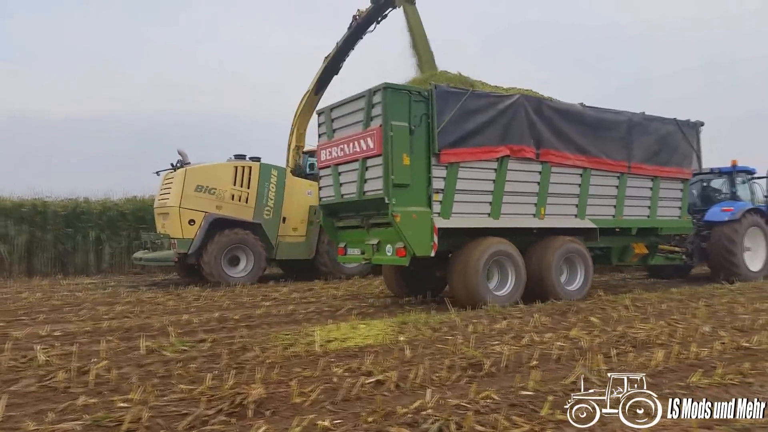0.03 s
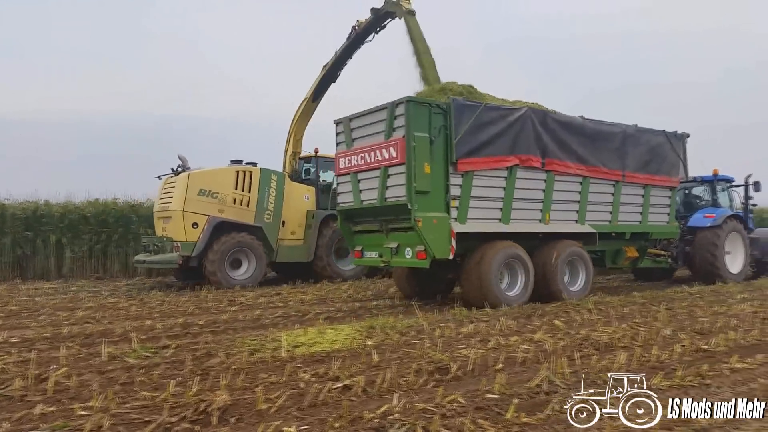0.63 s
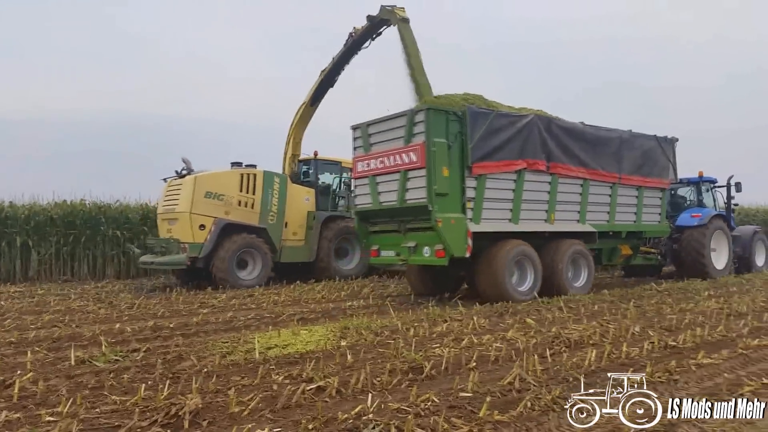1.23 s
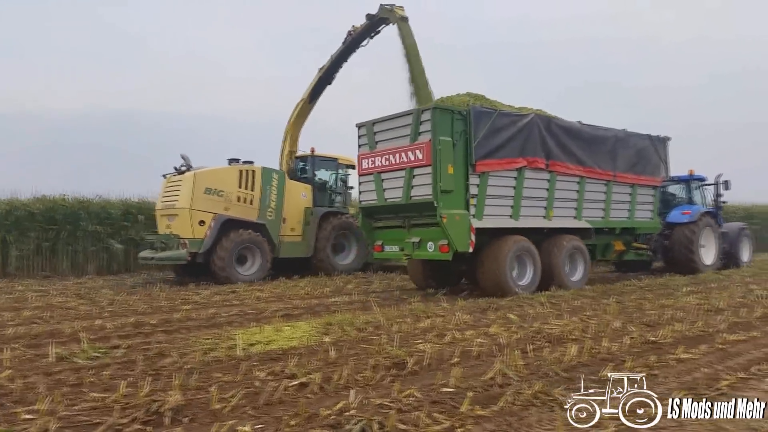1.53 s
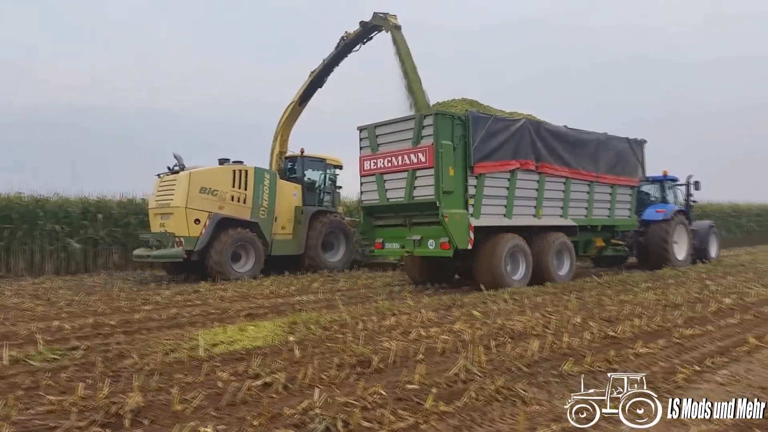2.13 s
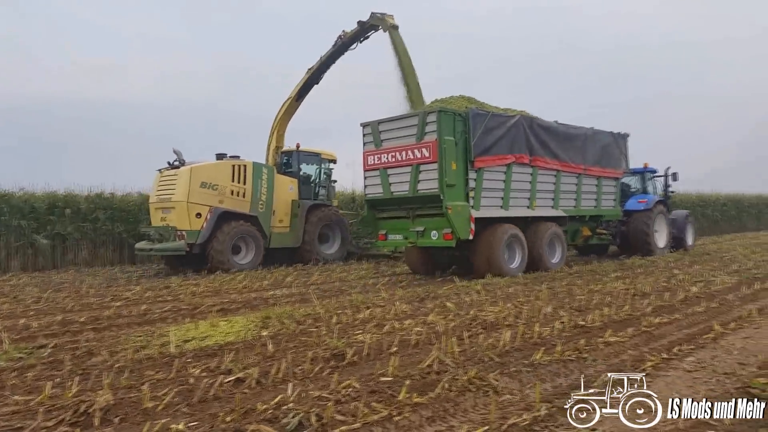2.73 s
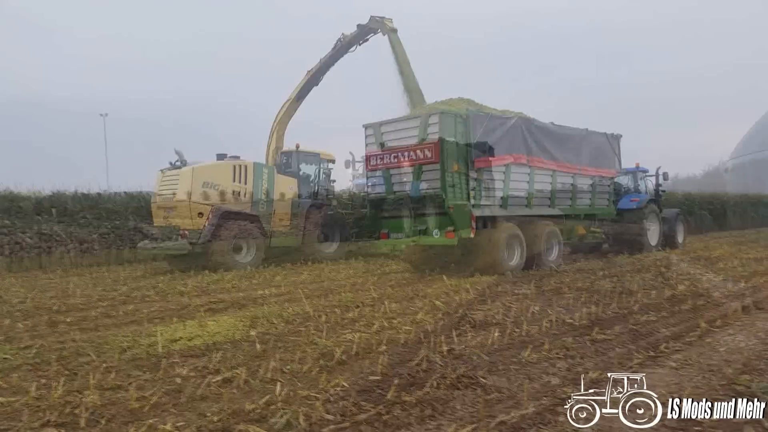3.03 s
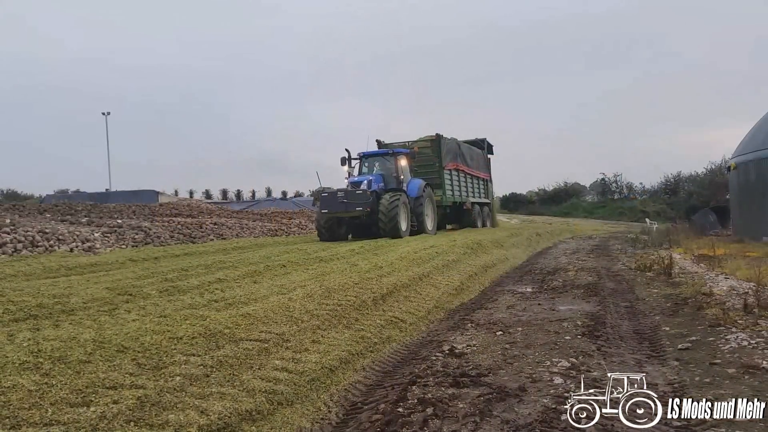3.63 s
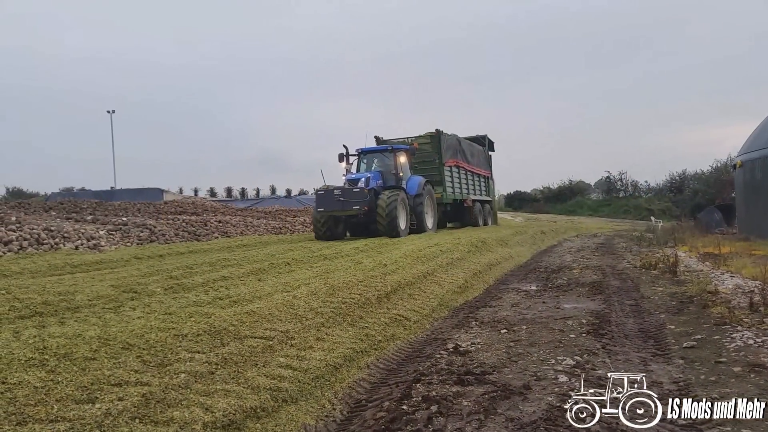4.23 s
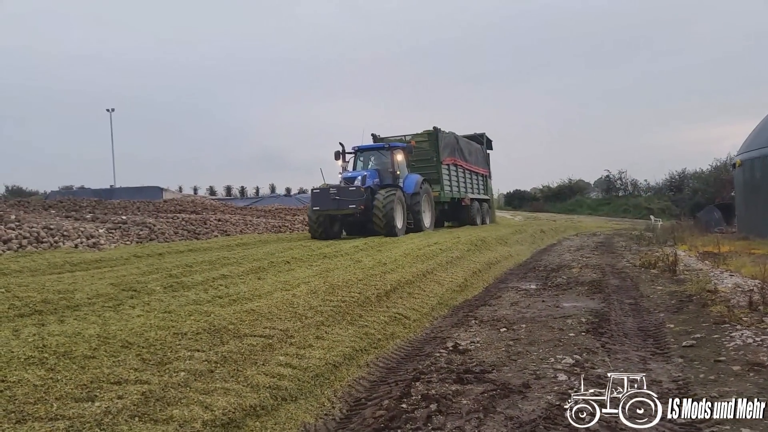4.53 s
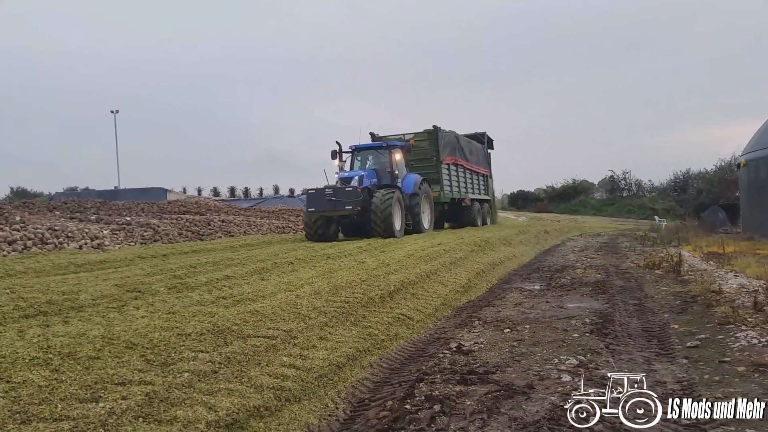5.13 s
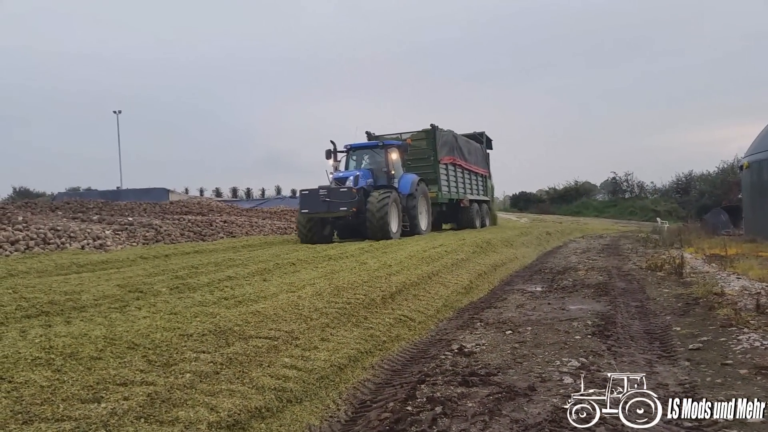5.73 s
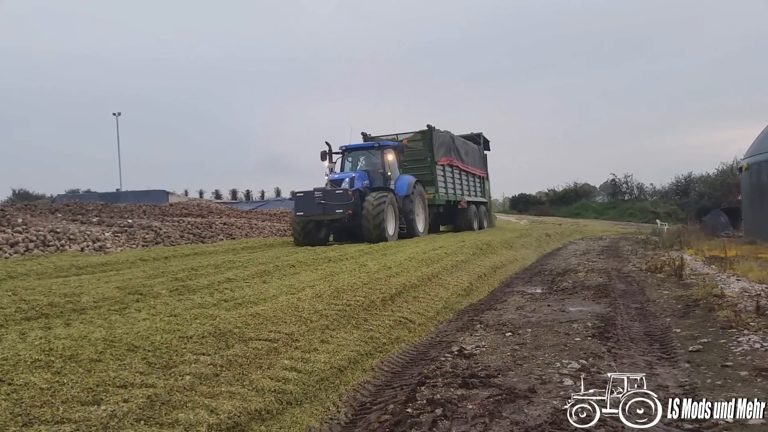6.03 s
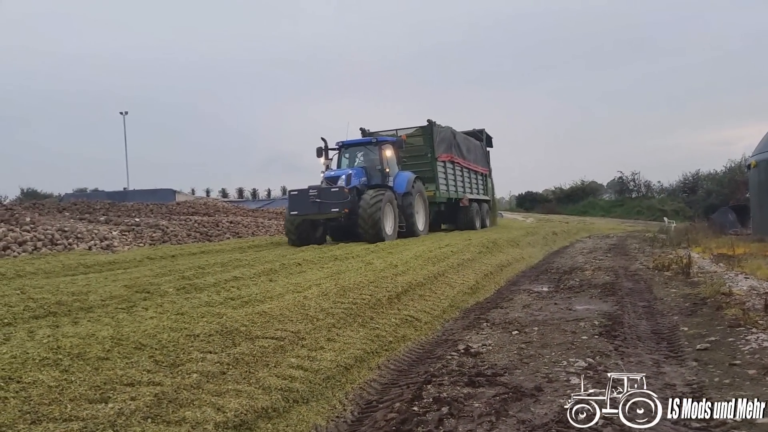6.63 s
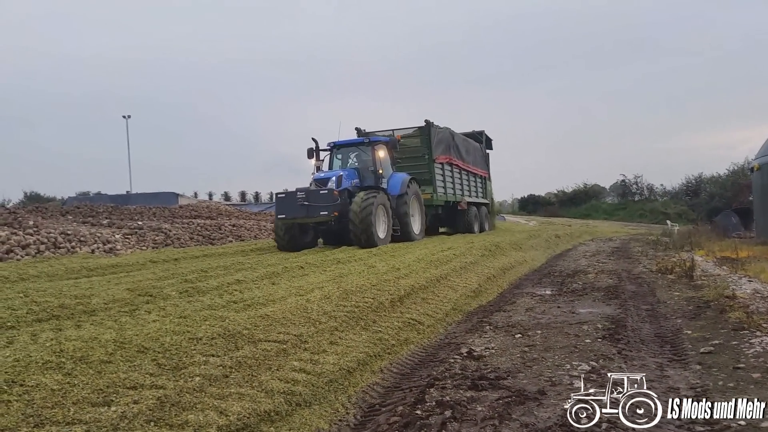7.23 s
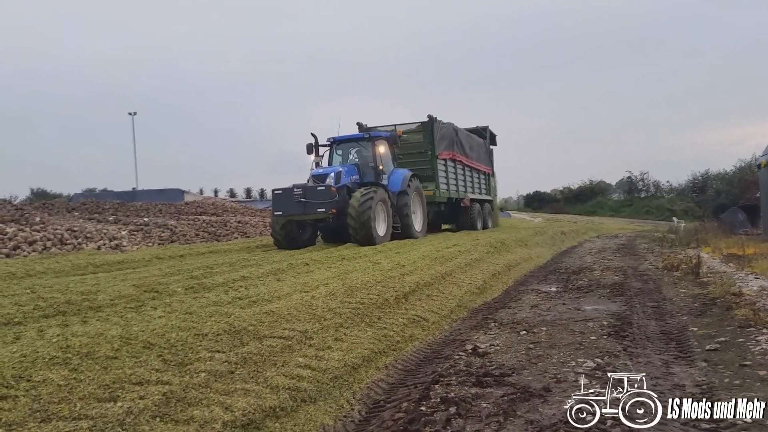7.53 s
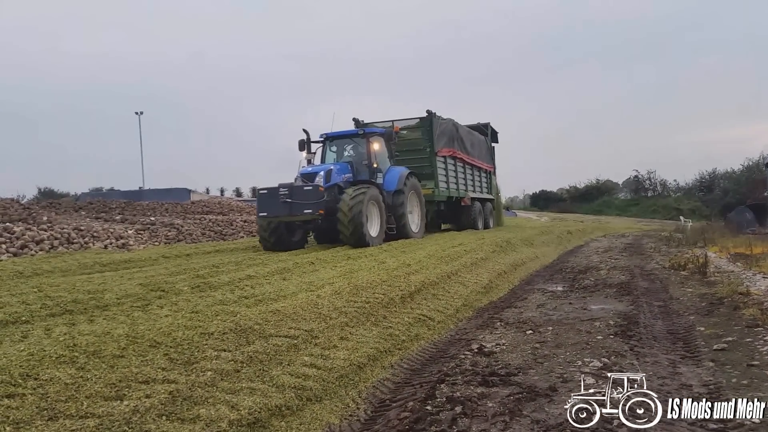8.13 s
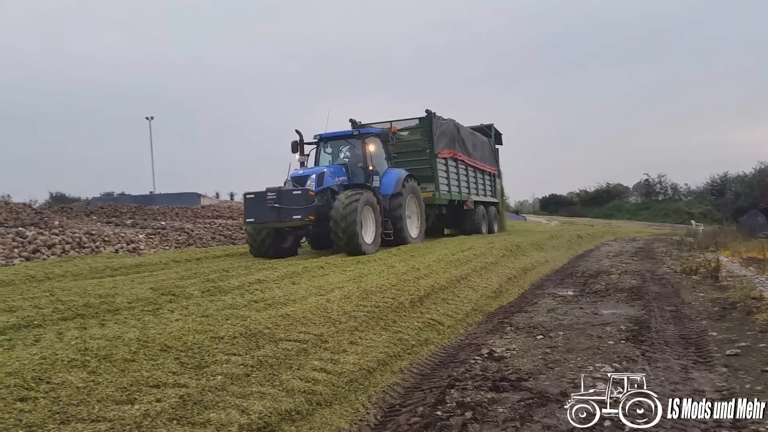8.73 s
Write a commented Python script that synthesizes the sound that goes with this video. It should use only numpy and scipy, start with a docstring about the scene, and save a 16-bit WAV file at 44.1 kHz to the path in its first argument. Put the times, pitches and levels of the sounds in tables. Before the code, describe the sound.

First comes the loud, steady roar and deep hum of a forage harvester, with a high whistle and crop hissing unevenly from its spout. Before halfway, this blends into the softer drone of a diesel tractor outdoors on a farm. The engine throbs and clatters as it slowly nears the microphone, joined by brief faint whines, short rustles of sliding crop and, late on, tiny high metal squeaks.

```python
"""On a farm at maize harvest, a forage harvester chops at full load: its diesel and cutter drum drone in the
blower's roar, two turbochargers whistle, and crop hisses from the spout in wads.
It fades over into a tractor creeping closer over a silage clamp with its trailer. Six cylinders thrum
and clatter, the turbo whistle follows the load, chopped crop slides and rustles, and steel chirps."""
import sys
import numpy as np
from scipy import signal
from scipy.fft import rfft, irfft, next_fast_len
from scipy.io import wavfile
from scipy.ndimage import map_coordinates

SR = 44100
rng = np.random.default_rng(int(sys.argv[2]) if len(sys.argv) > 2 else 0)


def pcm_store(signal):
    """Save signal as 16-bit PCM."""
    levels = np.round(np.clip(np.atleast_2d(signal), -1, 1) * 32767)
    wavfile.write(sys.argv[1], SR, levels.astype(np.int16).T)


N = 396018


def amp(db):
    """Amplitude ratio of a level in decibels."""
    return 10 ** (np.asarray(db) / 20)


def unit(x):
    """Normalisation to rms 1."""
    return x / np.sqrt(np.mean(x ** 2) + 1e-20)


def curves(rows):
    """Linear interpolation: one value per sample for each column after the time."""
    times, *columns = np.transpose(rows)
    return [np.interp(np.arange(N) / SR, times, column) for column in columns]


def wobble(rate):
    """Smooth random modulation, with rate knots a second."""
    knots = rng.standard_normal(int(N * rate / SR) + 4)
    return map_coordinates(knots, [np.arange(N) * rate / SR], mode="nearest")


def swells(rows):
    """Incoherent sum: powers of bell-shaped swells (time [s], half-power length [s], level [dB]) add."""
    t = np.arange(N) / SR
    return sum(amp(db) ** 2 * .5 ** ((2 * (t - s) / length) ** 2) for s, length, db in rows)


def filtered(x, response):
    """Linear filtering: the spectrum of x times a frequency response."""
    size = next_fast_len(N + 8192)
    return irfft(rfft(x, size) * response(np.fft.rfftfreq(size, 1 / SR)), size)[..., :N]


def below(hz, edge_hz):
    """Gain of a tenth-order low-pass."""
    return 1 / np.sqrt(1 + (hz / edge_hz) ** 20)


def split(x, edge_hz):
    """Crossover: the bands under and over an edge, each at rms 1."""
    low = filtered(x, lambda hz: below(hz, edge_hz))
    high = filtered(x, lambda hz: np.sqrt(1 - below(hz, edge_hz) ** 2))
    return np.array([unit(low), unit(high)])


def resonant(x, body):
    """A body's resonances and antiresonances colour x; the result has rms 1."""
    gain_db = lambda hz: sum(db * np.exp(-((hz - centre) / width) ** 2) for centre, width, db in body)
    return unit(filtered(x, lambda hz: amp(gain_db(hz))))


def pan(lean_db):
    """Constant-power panning: the left gain exceeds the right by lean_db."""
    gains = amp(np.array([np.atleast_1d(lean_db), -np.atleast_1d(lean_db)]) / 2)
    return gains / np.sqrt(np.mean(gains ** 2, axis=0))


def aslant(x, lead_ms, bass_rad):
    """Interchannel phase difference: the left leads in time, and by a further angle in the bass."""
    bass = lambda hz: bass_rad * hz / (hz + 20) / (1 + (hz / 900) ** 2)
    phase = lambda hz: 2 * np.pi * hz * lead_ms / 1000 + bass(hz)
    return filtered(x, lambda hz: np.exp(np.array([[1j], [-1j]]) * phase(hz) / 2))


def rush(colour, drive=1, lead_ms=0):
    """Partly coherent stereo noise of rms 1, modulated by drive, then coloured; the left leads."""
    knots_hz, level, lean, coherence = np.transpose(colour)
    size = next_fast_len(N + 8192)
    hz = np.fft.rfftfreq(size, 1 / SR) + 1
    along = lambda column: np.interp(np.log(hz), np.log(knots_hz), column)
    band = below(hz, knots_hz[-1] * 1.1) * below(knots_hz[0] / 1.1, hz)
    angle = np.arccos(np.clip(along(coherence), 0, 1)) / 2
    mid, side = rfft(drive * rng.standard_normal((2, N)), size)
    pair = np.cos(angle) * mid + np.array([[1], [-1]]) * np.sin(angle) * side
    delay = np.exp(np.array([[1j], [-1j]]) * np.pi * hz * lead_ms / 1000)
    return unit(irfft(pair * delay * pan(along(lean)) * amp(along(level)) * band, size)[:, :N])


def narrow(centre_hz, width_hz):
    """Random excitation of one resonance, in stereo at rms 1."""
    response = lambda hz: 1 / (1 + ((hz - centre_hz) / width_hz) ** 2) ** 2
    return unit(filtered(rng.standard_normal((2, N)), response))


def tone(turns, waver_db, rate):
    """A sinusoid of rms 1 under random amplitude modulation."""
    return unit(amp(waver_db * wobble(rate)) * np.sin(2 * np.pi * (turns + rng.random())))


def whistle(hz, jitter_hz, waver_db):
    """Random frequency modulation broadens a tone into a slightly fuzzy line."""
    return tone(np.cumsum(hz + jitter_hz * wobble(200)) / SR, waver_db, rate=25)


def grains(rate, life_s, spread_db):
    """Shot noise: an rms-1 envelope of many tiny impacts, a few of them large."""
    hits = (rng.random(N) < rate / SR) * amp(spread_db * np.minimum(rng.exponential(size=N), 4))
    return unit(np.sqrt(signal.lfilter([1], [1, -np.exp(-1 / (life_s * SR))], hits ** 2)))


def cycles(speed, flutter):
    """Phase is the integral of speed: one four-stroke cycle for two turns of the crank."""
    rpm, = curves(speed)
    return np.cumsum(rpm * (1 + flutter * wobble(14))) / (120 * SR)


def firings(cycle, decay, scatter_db, count):
    """An envelope of count exponential decays a cycle, each of random strength."""
    stroke, since = np.divmod(cycle * count, 1)
    strength = amp(scatter_db * rng.standard_normal(4096))[stroke.astype(int) % 4096]
    return unit(strength * np.exp(-since / decay))


def nearness():
    """Spherical spreading: the approaching tractor's gain goes as one over distance, and is 1 at 6.5 s."""
    distance_m, creep_m_per_s = 20, 0.98
    return distance_m / np.maximum(distance_m - creep_m_per_s * (np.arange(N) / SR - 6.5), 1)


def trailer_chirps():
    """Friction of steel on steel briefly excites two close, high modes."""
    # rubs on the trailer: (time [s], level [dB])
    rubs = [(7.499, -40), (7.64, -41), (7.70, -37), (7.735, -35), (7.81, -36), (8.015, -38), (8.066, -34),
            (8.24, -38), (8.485, -37), (8.593, -33), (8.642, -39), (8.77, -32), (8.877, -39), (8.927, -39)]
    t = np.arange(N) / SR
    envelope = sum(amp(db) * np.exp(-((t - s - .004) / 0.013) ** 2) for s, db in rubs)
    return envelope * rush([(7700, -10, -5, .5), (8446, 2, -10, 0.53), (8856, -14, -4, .6),
                            (9240, -3, -3, .6), (9600, -20, -3, .5)])


def silage():
    """Granular impacts: crop slides in spurts; hard ones ring the trailer wall and scrape lower down."""
    # sliding crop: (time [s], length [s], fizz over the trickle [dB], rustle over the trickle [dB])
    spurts = [(4.55, .07, 4, -5), (4.83, .07, 0, -6), (5.02, 0.065, 3.5, -6), (5.23, .1, 6, 0),
              (5.56, .04, 3, -6), (5.93, .06, 0, -9), (6.08, 0.12, 11, 6.5), (6.23, .2, 7, 1),
              (6.58, 0.061, 2, -7), (6.9, .06, 6, -7), (7.48, .14, 8, 2), (7.72, .16, 14, 5),
              (7.96, 0.26, 5, 2.5), (8.35, .25, 6, 2), (8.62, 0.11, 13, 0), (8.87, .35, 14, -1.5)]
    # rustle spectrum: (frequency [Hz], density [dB], left minus right [dB], coherence [0-1])
    colour = [(8100, -4, -13, 0.13), (9000, -4, 2, 0.056), (9950, 2.5, 1, 0.033), (12100, -1.5, 1.5, 0.034),
              (13450, -6, -2, 0.16), (14200, -2, -9, 0.34), (15600, -3, -8, .3)]
    # trailer wall's peaks and hollows: (frequency [Hz], width [Hz], gain [dB])
    wall = [(8560, 260, 8), (9220, 180, 8), (12900, 400, -2), (13600, 170, 3), (14303, 430, 7),
            (15450, 250, 4)]
    fine = 1 + swells((s, length, db) for s, length, db, _ in spurts)
    coarse = 1 + swells((s, length, db) for s, length, _, db in spurts)
    force = np.clip(10 * np.log10(fine) / 11 + .1, 0, 1)
    trickle = 0.5 + .5 * grains(rate=920, life_s=0.0015, spread_db=4)
    soft = split(rush(colour, trickle), edge_hz=12200)
    patter = 5 + 1.3 * grains(rate=330, life_s=0.0015, spread_db=7)
    hard = split(resonant(rush(colour, patter), wall), edge_hz=12600)
    rustle, fizz = np.sqrt(1 - force) * soft + np.sqrt(force) * hard
    scrape = amp(-2.5) * force * rush([(4000, -3, -9, .2), (5520, 1.5, -16, .2), (8000, -4, -15, .2)])
    crop = amp(-40.5) * np.sqrt(coarse) * (rustle + scrape) + amp(-47.5) * np.sqrt(fine) * fizz
    return nearness() ** 2.5 * crop


def transmission_whine():
    """The tractor's transmission radiates a narrow spectral line in short spells."""
    # spells of whine: (time [s], length [s], frequency [Hz], level [dB])
    spells = [(4.27, 0.33, 1000, -35.5), (5.382, 0.28, 905, -37.5), (6.581, 0.21, 896, -35),
              (7.08, 0.27, 910, -33)]
    return sum(np.sqrt(swells([(s, length, db)])) * whistle(hz, jitter_hz=9.1, waver_db=2)
               for s, length, hz, db in spells)


def tractor_turbo(hz, boost_khz):
    """Directivity: the whistle grows steeply as its beam nears, and also with turbo speed."""
    # flares of the whistle: (time [s], length [s], level over the usual [dB])
    flares = [(6.81, .06, 3), (7.92, 0.091, 8), (8.21, 0.05, 9)]
    beam = nearness() ** 3.8 * np.sqrt(1 + swells(flares))
    return amp(-49 + 3 * boost_khz) * beam * whistle(hz, jitter_hz=65, waver_db=2.2)


def tractor_rumble(cycle, boost_khz):
    """Amplitude modulation: low noise pulses at the firing rate and grows with load."""
    # rumble spectrum: (frequency [Hz], density [dB], left minus right [dB], coherence [0-1])
    colour = [(22, -28, -0.8, 0.97), (45, -13, -1.0, 0.98), (75, -6, 1, 0.96), (149, -7, -4.5, 0.94),
              (203, -7.5, 0, 0.91), (265, -11.5, -5, 0.96), (358, -15.5, -2, 0.94)]
    pulses = 1 + .5 * firings(cycle, decay=.5, scatter_db=3, count=6)
    return amp(-29.5 + 1.1 * boost_khz) * rush(colour, pulses, lead_ms=-0.017)


def tractor_clatter(cycle, boost_khz):
    """Impact excitation: injectors strike the block's modes once a firing, valves twice as often."""
    # clatter spectrum: (frequency [Hz], density [dB], left minus right [dB], coherence [0-1])
    colour = [(387, -13.5, -1, 0.68), (469, -0.7, -4.5, 0.96), (548, -6.5, -4.5, 0.91),
              (844, -4, -3.5, 0.84), (980, -3.5, -3.5, 0.93), (1306, -11.5, -2.5, 0.14),
              (1690, -4.5, -4.5, 0.68), (2045, -15, -4, 0.26), (2380, -10, -4, 0.66),
              (2830, -17.5, -12, 0.35), (3020, -16, -8, 0.47), (3820, -19, -10, 0.47),
              (6600, -22, -20, 0.19), (8200, -27, -5, 0.87)]
    # engine block's peaks and hollows: (frequency [Hz], width [Hz], gain [dB])
    block = [(491, 29, 0.5), (906, 19, 4), (965, 7.6, -1), (1623, 43, 2), (1720, 22, -4), (1820, 50, 1.5),
             (3130, 52, 5)]
    injectors = 0.23 * firings(cycle, decay=1, scatter_db=5, count=6)
    valves = 0.25 * firings(cycle, decay=1, scatter_db=4.5, count=12)
    knocks = rush(colour, 1 + injectors + valves, lead_ms=-0.047)
    return amp(-25.5 + 0.65 * boost_khz) * resonant(knocks, block)


def stack_puffs(cycle):
    """A pulse train: six cylinders each send a blunt puff up the stack, no two equally strong."""
    rise_share, scatter_db = .12, 3.5
    stroke, since = np.divmod(cycle * 6, 1)
    age = since / rise_share
    strength = amp(scatter_db * np.clip(rng.standard_normal(4096), -2, 2))[stroke.astype(int) % 4096]
    return unit(filtered(-strength * age * np.exp(-age), lambda hz: below(46, hz + 1) * below(hz, 370)))


def tractor_thrum(cycle):
    """Superposition: tones follow the crank, and two exhaust orders boom over the stack's puffs."""
    # engine tones, plus a faint wavering tone near 700 Hz that fills out the midrange:
    # (rate [per four-stroke cycle], level [dB])
    partials = [(5, -36), (6, -34), (7, -38), (8, -35.5), (9, -43.5), (15, -45.5), (17, -40.5), (20, -56),
                (30, -49.5), (45, -48), (50.5, -43.5)]
    # booming exhaust orders: (time [s], tenth order level [dB], twelfth order level [dB])
    boom = [(3.9, -27, -27), (4.35, -45, -31.5), (4.8, -27.5, -33), (5.5, -23, -36.5), (6.05, -21.5, -38),
            (6.25, -21, -24.5), (6.7, -32, -26), (7.2, -22.5, -28.5), (7.6, -33.5, -32.5), (7.9, -23, -22),
            (8.35, -29.5, -34.5), (8.6, -38, -40), (8.9, -28.5, -38)]
    tenth_db, twelfth_db = curves(boom)
    tones = sum(amp(db) * tone(multiple * cycle, waver_db=3.5, rate=5) for multiple, db in partials)
    tones += amp(tenth_db) * tone(10 * cycle, waver_db=0.8, rate=11)
    tones += amp(twelfth_db) * tone(12 * cycle, waver_db=1.3, rate=15)
    return tones + amp(-36.5) * nearness() * stack_puffs(cycle)


def tractor():
    """Phase locking: one crank times thrum, rumble and clatter; turbo speed stands for the load."""
    # crankshaft: (time [s], speed [rpm])
    speed = [(3.9, 1702), (4.7, 1677), (5.2, 1684), (5.75, 1703), (5.95, 1611), (6.1, 1617), (6.3, 1653),
             (6.55, 1669), (6.9, 1696), (7.2, 1686), (7.55, 1543), (7.75, 1602), (7.95, 1656), (8.45, 1631),
             (8.9, 1572)]
    # turbo whistle: (time [s], frequency [Hz])
    turbo_pitch = [(4.6, 10240), (5.9, 10050), (6.25, 10540), (6.65, 10900), (7.45, 10920), (7.9, 11280),
                   (8.25, 11300), (8.6, 10950), (8.98, 10500)]
    cycle = cycles(speed, flutter=.003)
    turbo_hz, = curves(turbo_pitch)
    boost_khz = (turbo_hz - 10600) / 1000
    thrum = tractor_thrum(cycle) * pan(-3)
    engine = nearness() * (tractor_rumble(cycle, boost_khz) + tractor_clatter(cycle, boost_khz))
    whine = transmission_whine() * pan(-5)
    return thrum + engine + whine + tractor_turbo(turbo_hz, boost_khz) * pan(2.2)


def twin_turbos():
    """Two turbochargers at full boost radiate tones slightly apart in frequency."""
    # whistles: (frequency [Hz], level [dB], jitter [Hz])
    turbos = [(8156, -42.3, 14), (8216, -45, 35)]
    return sum(amp(db) * whistle(hz + 8 * wobble(3), jitter_hz, waver_db=2)
               for hz, db, jitter_hz in turbos)


def spout(flow):
    """Comb filtering: a short reflection ripples the hiss of crop; thick wads ring the steel wall."""
    # spray spectrum: (frequency [Hz], density [dB], left minus right [dB], coherence [0-1])
    colour = [(7100, -11, 14, 0.46), (8070, -1.3, 28, 0.33), (9850, 0.5, 38, 0.27), (11500, -0.7, 27, 0.4),
              (13000, -4.5, 17, 0.4), (15600, -8, 7.8, 0.46)]
    # wall modes: (frequency [Hz], width [Hz], level [dB])
    modes = [(10000, 130, -12.5), (10600, 150, -15), (11420, 160, -14.5)]
    patter = 3.5 + 0.61 * grains(rate=1600, life_s=0.00087, spread_db=8)
    spray = rush(colour, patter, lead_ms=0.196)
    ripple_db = lambda hz: 2 * np.cos(2 * np.pi * (hz - 9980) / 700) * np.exp(-((hz - 11000) / 1600) ** 2)
    hiss = unit(filtered(spray, lambda hz: amp(ripple_db(hz))))
    ring = sum(amp(db + 1.6 * wobble(9)) * narrow(centre, width) for centre, width, db in modes)
    return amp(-32) * flow * hiss + amp(-34.8) * flow ** 1.96 * ring * pan(24)


def drum_rasp(cutting):
    """Forced resonance: the drum housing rasps as it chops."""
    return amp(-56 + wobble(8.86)) * cutting ** 1.86 * narrow(centre_hz=4370, width_hz=250)


def blower(cutting):
    """Lumpy feed modulates a broadband roar, coloured by the housing; the treble surges with chopping."""
    # roar spectrum: (frequency [Hz], density [dB], left minus right [dB], coherence [0-1])
    colour = [(22, -26.4, 1.7, 0.97), (45, -14, -1, 0.9), (77, -2.5, 1.5, 0.98), (140, 0.5, 0.5, 1),
              (255, -5, 0, 0.98), (414, -8, 1.5, 0.87), (483, -4.5, 3, 0.93), (920, -11, 3, 0.98),
              (1170, -18, 3, 1), (1790, -19.5, 7.5, 0.64), (3320, -27.5, 0.5, 0.52),
              (4410, -22.5, -0.5, 0.54), (6100, -29, 0, 0.9), (7060, -34.5, 23, 0.5)]
    # housing's peaks and hollows: (frequency [Hz], width [Hz], gain [dB])
    housing = [(397, 22, -1), (476, 31, 2), (728, 24, -4), (930, 75, 1.5), (2100, 56, -3.5), (3020, 120, 0),
               (3300, 170, -3), (3680, 90, -1), (3950, 120, -2.5), (4370, 200, 1)]
    feed = amp(0.77 * wobble(45))
    roar, chop = split(resonant(rush(colour, feed, lead_ms=0.22), housing), edge_hz=3260)
    return amp(-15.5) * aslant(roar, lead_ms=0, bass_rad=0.18) + amp(-41.5) * cutting ** 0.84 * chop


def harvester_drive():
    """Rotational orders: fixed belt and gear ratios lock cutter drum and gear mesh to the diesel."""
    # crankshaft: (time [s], speed [rpm])
    speed = [(0.05, 1896), (0.3, 1906), (0.55, 1879), (0.8, 1896), (1.05, 1888), (1.8, 1870), (2.1, 1896),
             (2.4, 1882), (3.0, 1892)]
    # diesel lines: (order [per four-stroke cycle], level [dB])
    orders = [(5, -57), (6, -18), (7, -34.5), (9, -33), (12, -25.5), (13, -28.5), (15, -31.5), (17, -38),
              (18, -34.5)]
    # driven lines: (cutter drum, its sum tone with the diesel, gear mesh), each [per four-stroke cycle]
    ratios = (19.43, 25.43, 176.1)
    cycle = cycles(speed, flutter=0.0015)
    drum_turns, sum_turns, gear_turns = np.outer(ratios, cycle)
    diesel = sum(amp(db) * tone(order * cycle, waver_db=1, rate=20) for order, db in orders)
    drum = amp(-19.5) * tone(drum_turns, waver_db=0.2, rate=12)
    drum += amp(-31.5) * tone(sum_turns, waver_db=1.5, rate=4)
    gear = amp(-50.5) * tone(gear_turns, waver_db=2.5, rate=7)
    return aslant(diesel * pan(-0.71) + drum * pan(-.3), lead_ms=0.18, bass_rad=0.11) + gear


def harvester():
    """Superposition: machine tones stand in the noise of blower, drum and spout, which wads modulate."""
    # wads of crop: (time [s], length [s], flow over even feed [dB], cutting over even feed [dB])
    wads = [(0.09, 0.096, 3, 5), (0.22, 0.064, 3.5, -1), (0.47, 0.18, 3.5, 3.5), (0.66, 0.26, -1, 6),
            (1.13, 0.11, 4.5, 5), (1.22, .08, -4, 3), (1.37, 0.13, 0.5, -1), (1.68, 0.094, -0.5, -8),
            (2.02, 0.1, 1, 3), (2.15, .12, 5.5, 2), (2.3, .1, -4, -1), (2.57, 0.15, 3, 0),
            (2.73, 0.12, 4, 5.5), (2.93, 0.16, 3, 4), (3.27, .16, 6, 4), (3.65, .16, 4, 4)]
    flow = np.sqrt(1 + swells((s, length, db) for s, length, db, _ in wads))
    cutting = np.sqrt(1 + swells((s, length, db) for s, length, _, db in wads))
    return harvester_drive() + blower(cutting) + drum_rasp(cutting) + spout(flow) + twin_turbos() * pan(24)


def scene():
    """Cross-fade: near 4 s the harvester gives way to the tractor, faint beneath it until then."""
    leaving, = curves([(3.08, 1), (3.5, 0.7), (3.8, 0.32), (3.98, 0.0077)])
    arriving, = curves([(3.1, 0.2), (3.8, 0.28), (4.0, 0.64), (4.15, 0.75)])
    return leaving * harvester() + arriving * (tractor() + silage() + trailer_chirps())


def record(dry):
    """Soft saturation rounds the highest peaks, and a band limit removes the extreme treble."""
    ceiling, top_hz = .96, 15780
    rounded = dry / (1 + np.abs(dry / ceiling) ** 10) ** (1 / 10)
    return filtered(rounded, lambda hz: hz < top_hz)


dry = scene()
out = record(dry)
pcm_store(out)
```